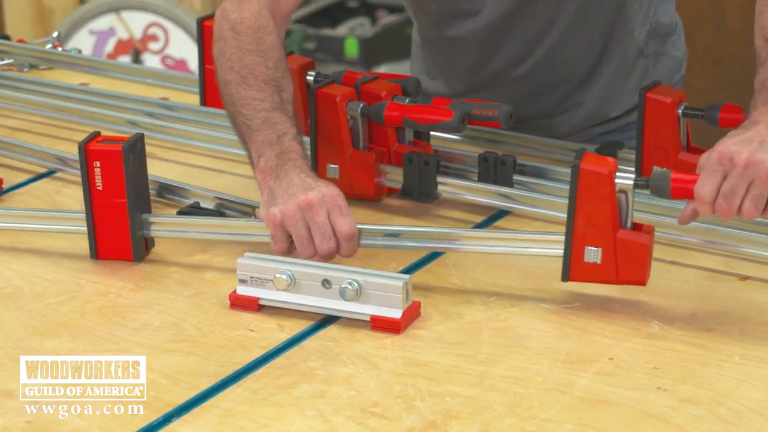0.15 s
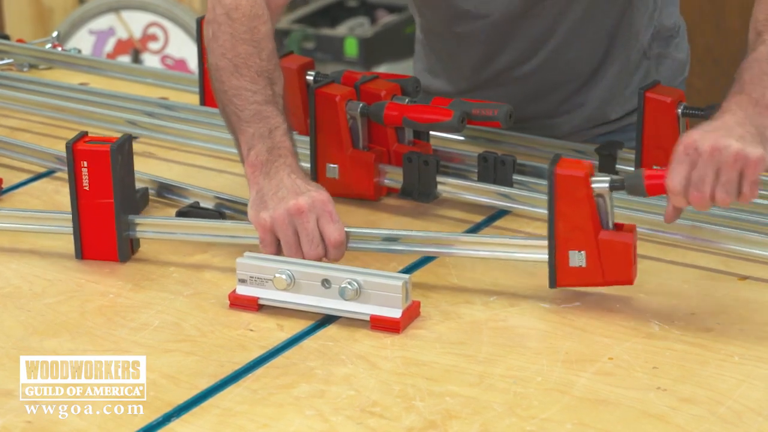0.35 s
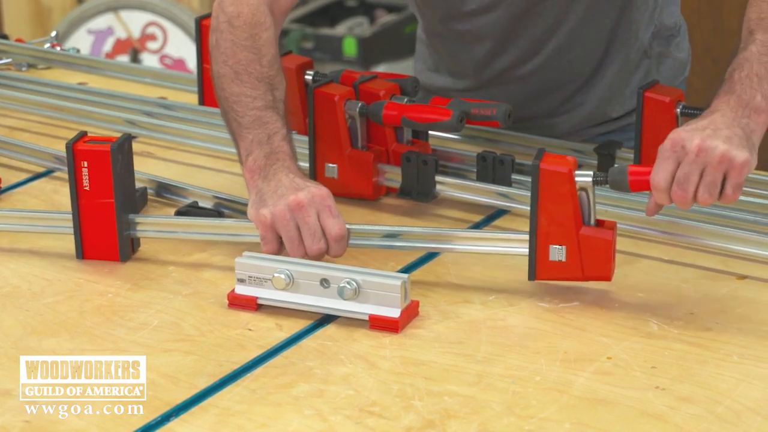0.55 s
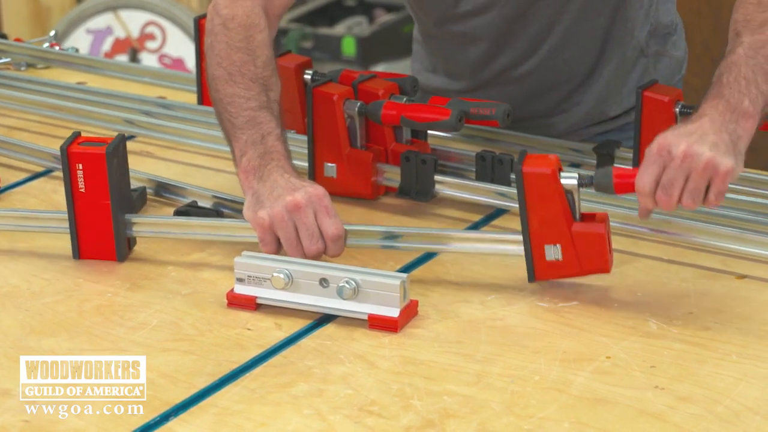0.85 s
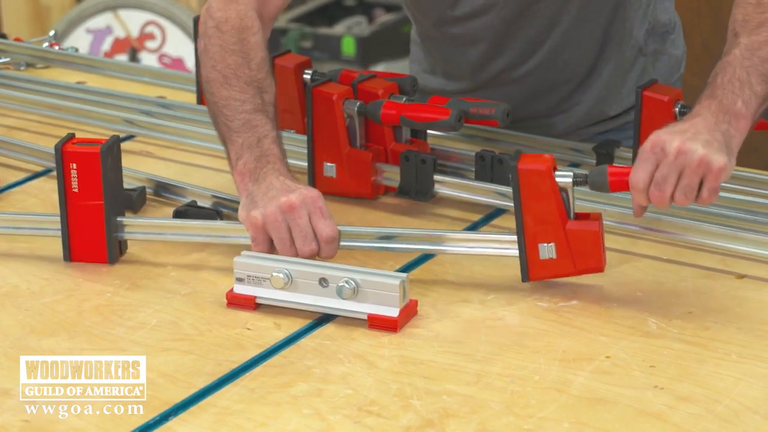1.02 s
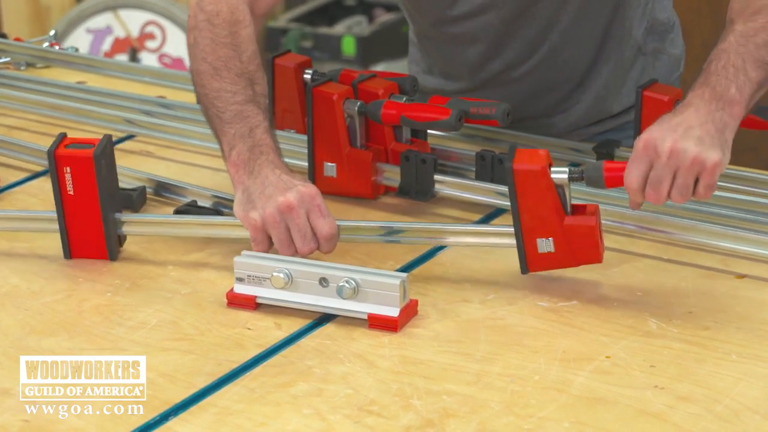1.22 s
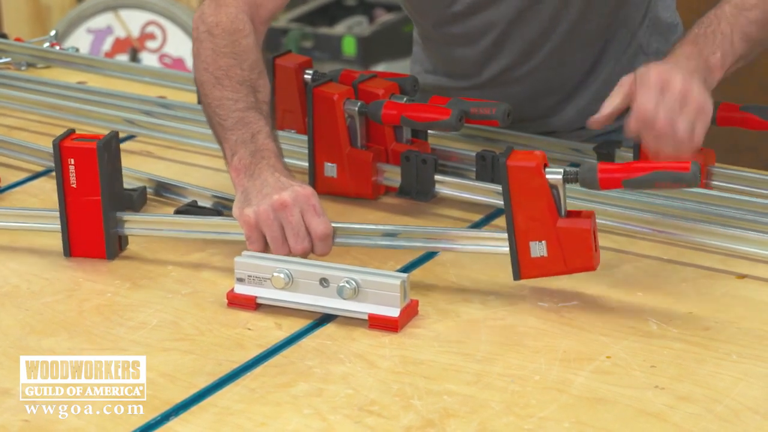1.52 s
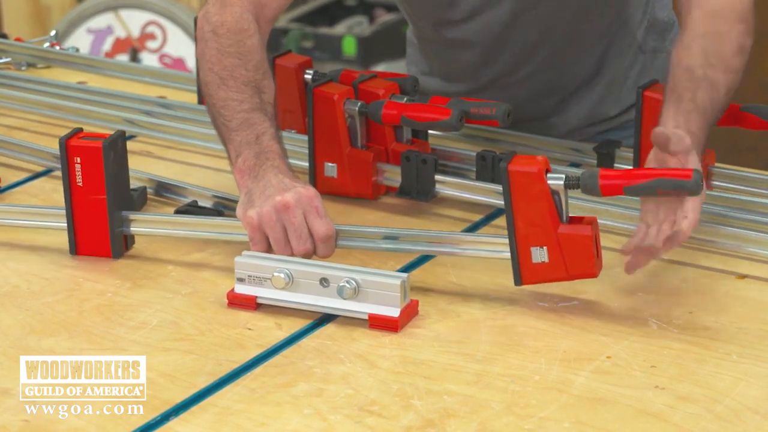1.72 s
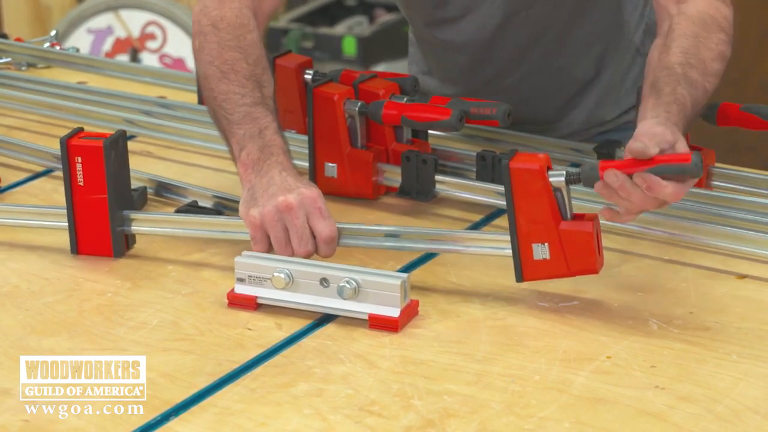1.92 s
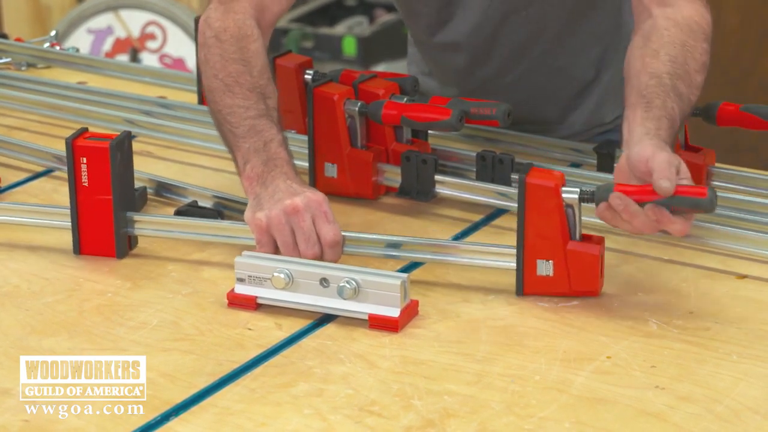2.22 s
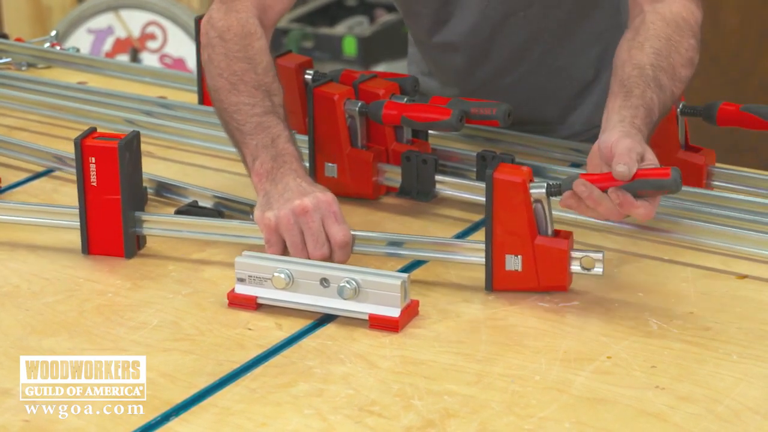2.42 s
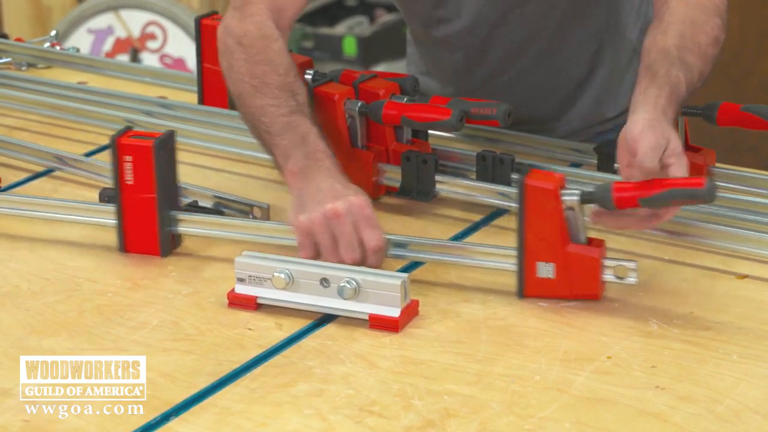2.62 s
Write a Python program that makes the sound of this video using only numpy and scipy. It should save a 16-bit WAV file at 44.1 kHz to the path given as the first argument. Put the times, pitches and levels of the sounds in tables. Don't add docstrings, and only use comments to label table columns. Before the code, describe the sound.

A steel bar clamp handled on a wooden bench, its loose head clacking, scraping and thumping

```python
import sys
import numpy as np
from scipy import signal
from scipy.fft import rfft, irfft, next_fast_len
from scipy.io import wavfile
from scipy.ndimage import uniform_filter1d, map_coordinates

SR = 44100
rng = np.random.default_rng(int(sys.argv[2]) if len(sys.argv) > 2 else 0)


def magnitude_from_level(level_db):
    exponent = np.asarray(level_db, float) / 20
    return 10 ** exponent


def to_wav(s):
    ch = np.atleast_2d(s).T
    pcm = np.round(np.clip(ch, -1, 1) * 32767)
    wavfile.write(sys.argv[1], SR, pcm.astype(np.int16))


N = 121275

# (pitch [Hz], width [Hz], level [dB])
HEAD_MODES = [(1024, 320, 2), (1507, 167, 4), (2315, 830, -2.5), (2540, 142, 4.5), (2770, 680, -4.5),
              (3867, 355, 1.5), (4420, 650, -3.5), (5760, 1500, -9)]
# (pitch [Hz], width [Hz], level [dB])
STEEL_MODES = [(7430, 2130, -0.5), (9970, 1600, 0), (12050, 1360, 3), (14580, 500, 5), (16470, 360, -23.5)]
# (pitch [Hz], width [Hz], level [dB])
BOOM_MODES = [(85.5, 53, -5), (149, 40, -2), (221, 21.6, -2.5)]
# (pitch [Hz], width [Hz], level [dB])
KNOCK_MODES = [(330, 43, -1), (387.7, 13.6, 3.5), (486, 104, -1.5), (553, 24.4, 3), (623.5, 77, -4),
               (755, 19.3, 0.5), (1007, 171, -5.5)]

SCATTER_DB = 2
HEAD_DULL_HZ, KNOCK_DULL_HZ = 8000, 1500
SWELL_S = 0.015


def along(points, hz):
    f, v = np.transpose(points)
    return np.interp(np.log(hz + 1), np.log(f + 1), v)


def unit(x):
    return x / np.sqrt(np.mean(x ** 2) + 1e-20)


def loud(ring):
    return ring / np.sqrt(uniform_filter1d(ring ** 2, size=176).max())


def filtered(x, response):
    m = next_fast_len(2 * len(x))
    return irfft(rfft(x, m) * response(np.fft.rfftfreq(m, 1 / SR)), m)[:len(x)]


def dulled(x, hz):
    return filtered(x, lambda f: 1 / (1 + 1j * f / hz) ** 2)


def resonant(x, modes, scatter_db, signs=-1):
    gains = magnitude_from_level(scatter_db * rng.standard_normal(len(modes)))

    def response(f):
        total = 0
        for k, (hz, width, db) in enumerate(modes):
            mode = 1j * f * width / (hz * hz - f * f + 1j * f * width)
            total = total + signs ** k * gains[k] * magnitude_from_level(db) * mode
        return total

    return filtered(x, response)


def blow(modes, length_s, size, dull_hz=np.inf):
    t = np.arange(size) / SR
    onset = 1 - np.exp(-(t / 0.0012) ** 2)
    burst = np.exp(-(t / length_s) ** 2 * t / length_s)
    rattle = 0.47 * np.exp(-t / length_s / 2.32)
    clumps = magnitude_from_level(2.5 * map_coordinates(rng.standard_normal(size // 16), [t * 2500]))
    impacts = onset * (burst + rattle) * clumps * rng.standard_normal(size)
    return loud(dulled(resonant(impacts, modes, SCATTER_DB), dull_hz))


def add(track, s, x):
    part = track[max(round(s * SR), 0):][:len(x)]
    part += x[:len(part)]


def head():
    # (time [s], body level [dB],
    # sizzle level [dB], chatter length [s], leading mode [Hz])
    contacts = [(0.1985, -32.5, -38.5, 0.006, 1000), (0.2175, -20, -27, 0.0031, 1157),
                (0.23, -41, -45, 0.0063, 1100), (0.2505, -31, -33.5, 0.0043, 2430),
                (0.282, -27.5, -42, 0.0057, 1220), (0.29, -40, -36, 0.0042, 1080),
                (0.525, -30, -33.5, 0.017, 1110), (0.534, -23.5, -27.5, 0.0023, 1440),
                (0.6, -25, -35.5, 0.014, 4430), (0.6065, -21.5, -25, 0.0085, 3850),
                (0.618, -28, -32, 0.006, 1090), (0.737, -35.5, -41, 0.0025, 3400),
                (0.752, -33.5, -39, 0.0089, 4000), (0.762, -22.5, -28.5, 0.0036, 1170),
                (0.783, -35, -34, 0.004, 2980), (0.8, -46, -48, 0.0065, 1130),
                (1.066, -31.5, -52, 0.0071, 1485), (1.088, -33, -48, 0.005, 2900),
                (1.335, -32, -65, 0.0078, 1130), (1.578, -37.5, -42.5, 0.0026, 1019),
                (1.586, -31, -45, 0.012, 1213), (1.605, -35.5, -48.5, 0.0049, 3800),
                (2.03, -33, -54, 0.0087, 1116), (2.079, -38, -42.5, 0.0019, 1074),
                (2.086, -32, -39, 0.0015, 1230), (2.096, -39.5, -47, 0.0054, 2360),
                (2.2645, -26.5, -29.5, 0.0032, 5890), (2.273, -27, -26, 0.0036, 1390),
                (2.307, -26.5, -27, 0.0069, 3820), (2.397, -28, -35, 0.0039, 4450),
                (0.16, -50, -77, 0.0096, 910), (0.362, -40, -60, 0.0048, 1373),
             (0.407, -42.5, -47.5, 0.0051, 3700), (0.439, -41, -53, 0.0051, 2540),
             (0.45, -41, -44, 0.0023, 3500), (0.484, -37, -75, 0.004, 4030),
             (0.515, -42.5, -51, 0.0039, 2850), (0.577, -38, -39, 0.0038, 2950),
             (0.633, -33, -39, 0.0053, 4300), (0.936, -41.5, -54, 0.0052, 2810),
             (1.186, -38, -65, 0.0041, 1170), (1.194, -42, -45, 0.0081, 2440),
             (1.368, -44, -47.5, 0.0021, 2370), (1.639, -39.5, -73, 0.0047, 1140),
             (1.971, -38.5, -70, 0.0059, 1495), (1.982, -55.5, -41.5, 0.0044, 990),
             (2.022, -38, -49.5, 0.0079, 1125), (2.052, -53, -48, 0.0032, 1510),
             (2.116, -54, -50, 0.0024, 2400), (2.161, -34.5, -69, 0.006, 1340),
             (2.243, -41.5, -50, 0.012, 1420), (2.295, -32.5, -49, 0.011, 2970),
             (2.689, -37.5, -48, 0.0013, 1720),
                (0.563, -47, -45, 0.004, 2210), (0.789, -31, -43.5, 0.0056, 3780),
             (1.073, -38, -37.5, 0.0046, 1540), (1.174, -55, -53, 0.004, 3750),
             (1.309, -51.5, -56, 0.0082, 2310), (1.36, -62.5, -63, 0.016, 4400),
             (1.557, -58, -63, 0.004, 5470), (1.687, -48, -62, 0.0017, 1120),
             (1.726, -71.5, -64.5, 0.0024, 3730), (2.036, -49, -54, 0.007, 1070),
             (2.229, -51, -61, 0.005, 3700), (2.285, -37, -47, 0.008, 4560),
             (2.316, -35.5, -47, 0.0041, 1380), (2.349, -36.5, -63, 0.0093, 3740),
             (2.377, -39, -50, 0.0085, 5160), (2.402, -33.5, -33, 0.0042, 5240),
             (2.414, -31, -41, 0.004, 1500), (2.423, -26, -45, 0.004, 1390),
             (2.445, -29, -32, 0.0074, 1230), (2.512, -29.5, -33.5, 0.0043, 830),
             (2.54, -43, -38, 0.0031, 5000), (2.563, -38, -45, 0.0054, 4230),
             (2.68, -58, -55, 0.0039, 1410), (2.7, -46, -48, 0.0026, 3870)]
    out = np.zeros(N)
    for s, body_db, sizzle_db, length, hz in contacts:
        leading_mode = (hz, 0.084 * hz, 10)
        modes = sorted([*HEAD_MODES, leading_mode])
        dull_hz = HEAD_DULL_HZ * np.exp(0.025 * (sizzle_db - body_db))
        body = blow(modes, length, size=2048, dull_hz=dull_hz)
        add(out, s, magnitude_from_level(body_db - 0.5) * body)
        sizzle = blow(STEEL_MODES, length, size=2048)
        add(out, s, magnitude_from_level(sizzle_db - 1) * sizzle)
    return out


def bench():
    # (time [s], boom level [dB], knock level [dB], boom pitch [Hz])
    thumps = [(0.219, -33.5, -41.5, 157), (0.2806, -19.5, -24, 153), (0.29, -25.5, -29.5, 137),
              (0.358, -31, -36.5, 232), (0.537, -29.5, -46, 222), (0.61, -21.5, -30, 232),
              (0.626, -28, -34.5, 231), (0.764, -21.5, -33, 163.4), (0.781, -27.5, -39.5, 167),
              (0.8, -25.5, -28.5, 232), (1.06, -25, -41, 123.6), (1.088, -32, -44, 163),
              (1.179, -26, -45, 155), (1.196, -39, -65, 163), (1.3, -35, -44.5, 147),
              (1.335, -30.5, -39.5, 153), (1.546, -39, -56, 229), (1.577, -25.5, -31, 150),
              (1.661, -33.5, -47, 140), (1.684, -29.5, -38, 238), (1.97, -47.5, -59, 195),
              (1.984, -43.5, -71, 194), (2.024, -38, -59, 232), (2.038, -37, -49, 203),
              (2.056, -34.5, -63, 220), (2.078, -23, -29.5, 154), (2.093, -30.5, -39.5, 138),
              (2.159, -24, -32.5, 159), (2.267, -30.5, -38, 161), (2.305, -20.5, -22, 148),
              (2.418, -28, -30, 150), (1.035, -47, -62, 174), (2.54, -39, -38.5, 175),
              (2.69, -44.5, -56, 169)]
    out = np.zeros(N)
    t = np.arange(6144) / SR
    phase = np.pi * np.clip(t / 0.0034, 0, 2)
    push = -np.sin(phase) * (1 - np.cos(phase))
    for s, boom_db, knock_db, hz in thumps:
        modes = [(hz, 16, 0), *BOOM_MODES]
        boom = loud(resonant(push, modes, SCATTER_DB, signs=0.97))
        add(out, s, magnitude_from_level(boom_db + 2) * boom)
        knock = blow(KNOCK_MODES, 0.0052, size=6144, dull_hz=KNOCK_DULL_HZ)
        add(out, s, magnitude_from_level(knock_db + 1.5) * knock)
    return out


def scrape():
    # (start [s], length [s], body level [dB], sizzle level [dB], bench level [dB])
    slides = [
        (.001, 0.19, -60.5, -77, -58.5),
        (0.19, 0.14, -43.5, -54, -48.5),
        (0.564, 0.062, -40.5, -47, -42),
        (0.737, 0.062, -34, -45, -46.5),
        (1.113, 0.34, -61, -68, -81),
        (1.559, 0.21, -58, -75, -45),
        (2.016, 0.044, -41, -67, -47.5),
        (2.407, 0.11, -33, -38.5, -39),
        (2.505, 0.058, -41.5, -46.5, -42),
        (2.652, 0.1, -58, -61.5, -53),
    ]
    t = np.arange(N) / SR
    roughness = magnitude_from_level(3 * map_coordinates(rng.standard_normal(2500), [t * 500]))
    grit = roughness * rng.standard_normal(N)
    body = unit(resonant(grit, HEAD_MODES, 0))
    sizzle = unit(resonant(grit, STEEL_MODES, 0))
    wood = unit(resonant(grit, [*KNOCK_MODES, *BOOM_MODES], 0))
    body = unit(dulled(body, HEAD_DULL_HZ / 2))
    wood = unit(dulled(wood, KNOCK_DULL_HZ))
    layers = np.array([body, sizzle, wood])
    out = np.zeros(N)
    for s, length, *levels_db in slides:
        rise = np.clip((t - s) / SWELL_S, 0, 1)
        fall = np.clip((s + length - t) / 0.06 + 0.5, 0, 1) ** 2
        out += rise * fall * (magnitude_from_level(levels_db) @ layers)
    return out


def singing():
    # (start [s], length [s], pitch [Hz], width [Hz], level [dB])
    tones = [(.002, 0.089, 690, 370, -55), (0.292, 0.12, 728.4, 16, -41), (.8, 0.11, 721, 38, -45.5),
             (1.076, 0.041, 925, 110, -43), (1.11, 0.11, 1200, 25, -53), (1.337, 0.043, 516, 65, -45),
             (1.59, 0.12, 1136, 85, -44), (1.659, 0.14, 755, 18, -51.5), (1.967, 0.019, 930, 90, -42.5),
             (2.093, 0.028, 630, 42, -32.5), (2.24, 0.038, 1410, 120, -40), (2.419, 0.033, 1330, 250, -33),
             (2.441, 0.077, 4430, 480, -34), (2.44, 0.078, 3130, 670, -35.5),
             (2.513, 0.035, 840, 100, -36.5)]
    out = np.zeros(N)
    t = np.arange(SR // 2) / SR
    for s, length, hz, width, db in tones:
        tone = resonant(rng.standard_normal(len(t)), [(hz, width, 0)], 0)
        tone = unit(resonant(tone, [(hz, 2 * width, 0)], 0))
        swell = np.clip(t / SWELL_S, 0, 1) * np.exp(-(t / length) ** 2)
        add(out, s, magnitude_from_level(db) * tone * swell)
    return out


def workshop(x):
    # (pitch [Hz], time [s])
    fade_times = [(110, 0.33), (310, 0.68), (1500, 0.73), (5100, 0.6), (12800, 0.19)]
    # (pitch [Hz], level [dB])
    echo_tone = [(85, -5.5), (310, -7.5), (1050, -9), (4100, -12.5), (12800, -14.5)]
    out = np.zeros(N)
    step = SR // 4
    for start in range(0, N, step):
        hz, t, z = signal.stft(rng.standard_normal(SR), SR, nperseg=256)
        z = z * magnitude_from_level(-60 * t / along(fade_times, hz)[:, None])
        z = z / np.linalg.norm(z, axis=1)[:, None]
        tail = signal.istft(z, SR, nperseg=256)[1]
        tail = tail / np.linalg.norm(tail)
        echo = signal.fftconvolve(x[start:start + step], tail)
        add(out, start / SR + 0.0054, echo)
    return filtered(out, lambda f: magnitude_from_level(along(echo_tone, f)))


def air():
    # (pitch [Hz], level per Hz [dB])
    color = [(30, -4), (150, -11.5), (900, -26), (3500, -44), (15000, -45)]
    noise = filtered(rng.standard_normal(N), lambda f: magnitude_from_level(along(color, f)))
    return magnitude_from_level(-57) * unit(noise)


def scene():
    near = head() + bench() + scrape() + singing()
    return (near + workshop(near) + air())[None]


def band_limit(x):
    return signal.sosfilt(signal.butter(12, 16990, fs=SR, output="sos"), x)


def record(dry):
    bass_hz, top_hz = 60, 15700

    def microphone(f):
        bass_cut = (1j * f / bass_hz) ** 2 / (1 + 1j * f / bass_hz) ** 2
        return bass_cut / (1 + (f / top_hz) ** 40)

    mix = filtered(dry[0], microphone)[None]
    return band_limit(mix)


dry = scene()
out = record(dry)
to_wav(out)
```